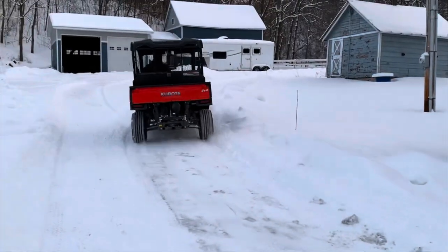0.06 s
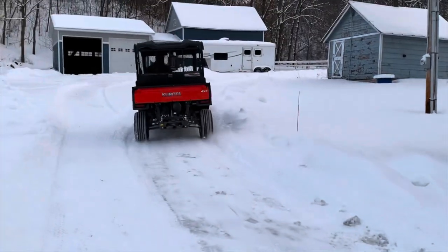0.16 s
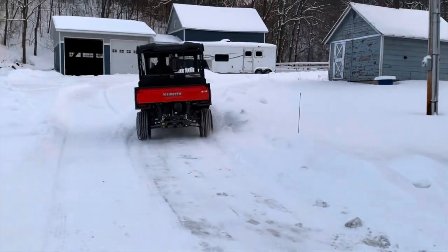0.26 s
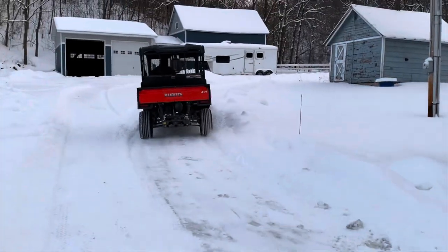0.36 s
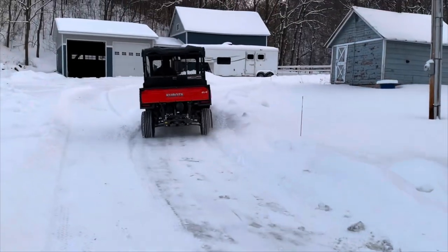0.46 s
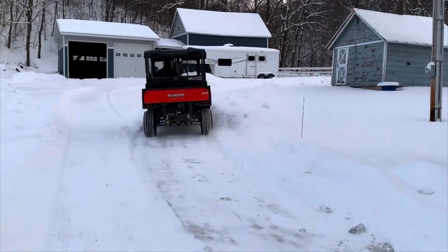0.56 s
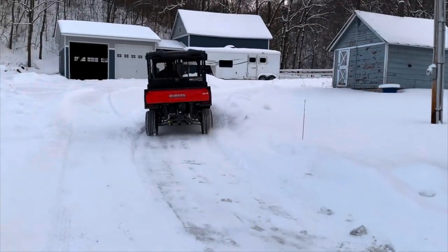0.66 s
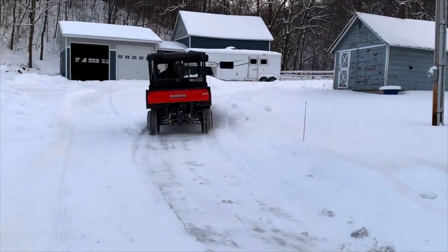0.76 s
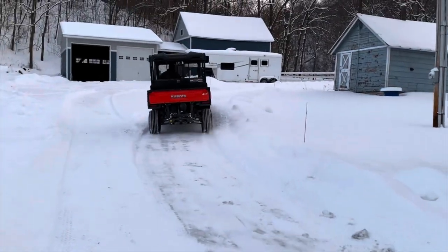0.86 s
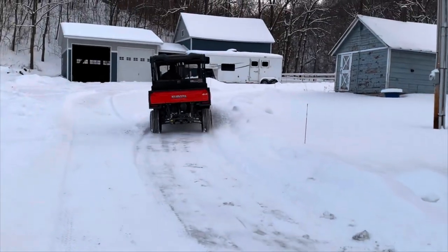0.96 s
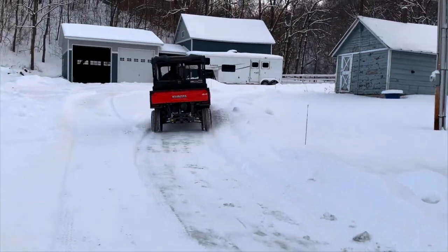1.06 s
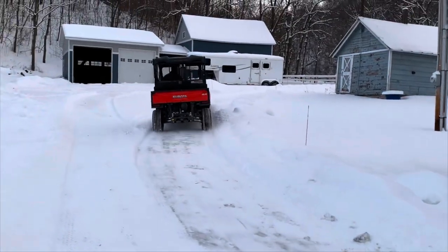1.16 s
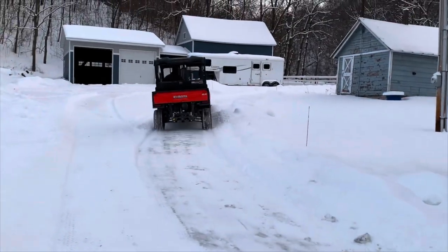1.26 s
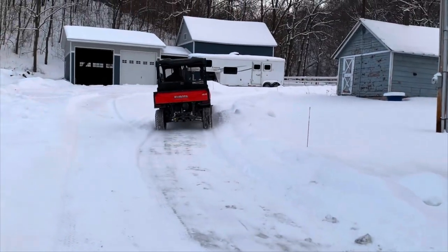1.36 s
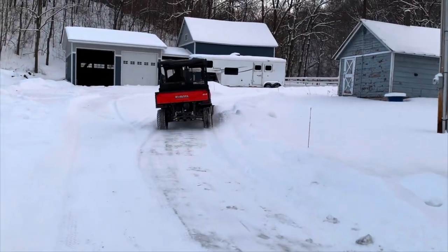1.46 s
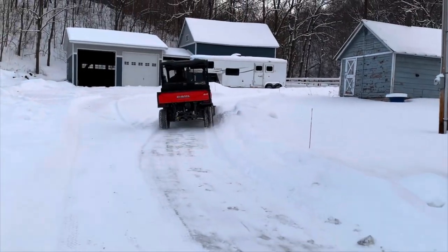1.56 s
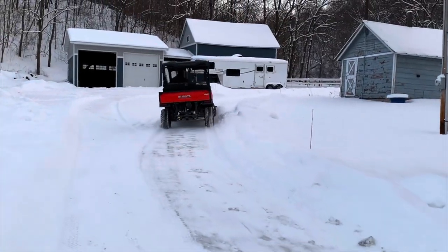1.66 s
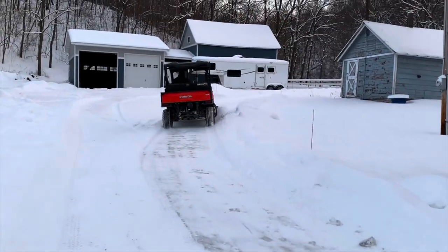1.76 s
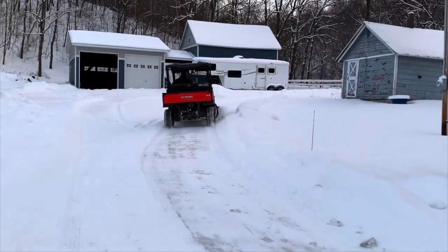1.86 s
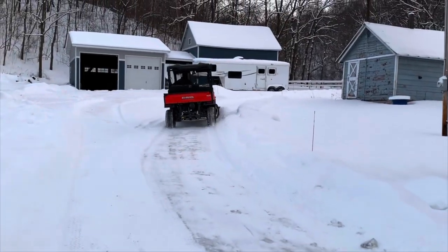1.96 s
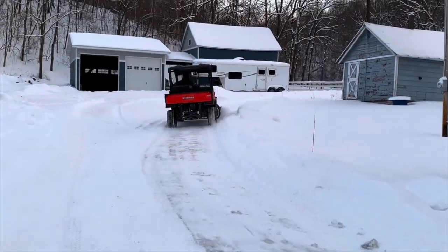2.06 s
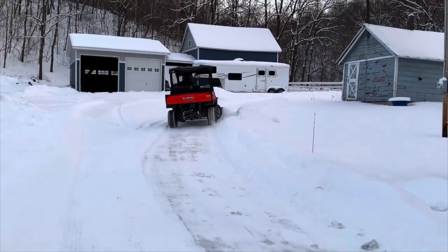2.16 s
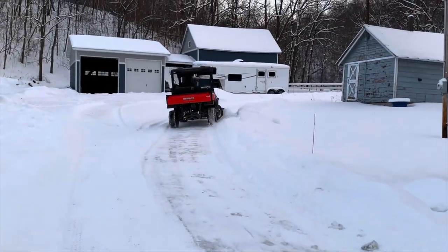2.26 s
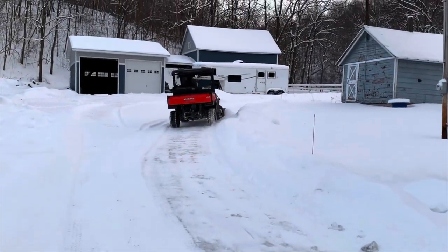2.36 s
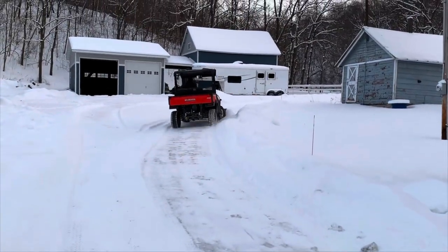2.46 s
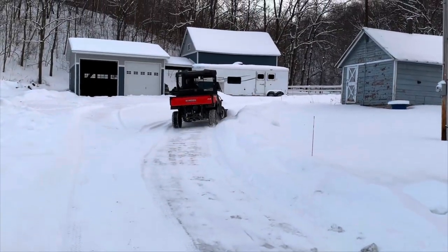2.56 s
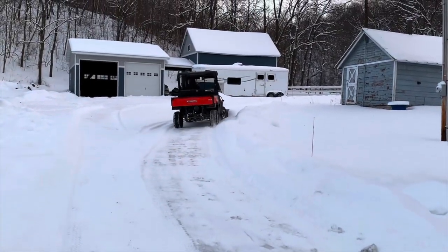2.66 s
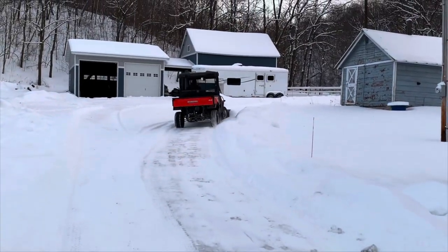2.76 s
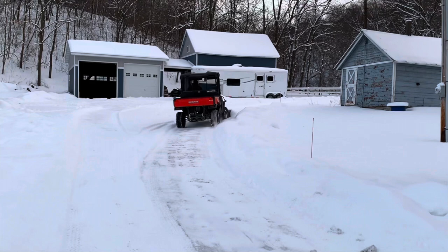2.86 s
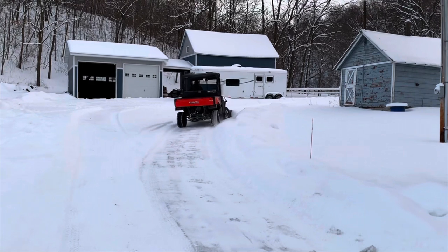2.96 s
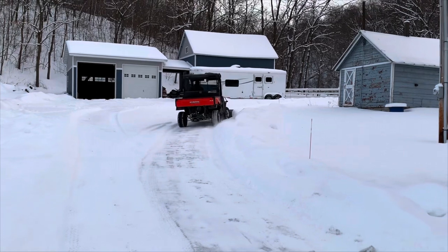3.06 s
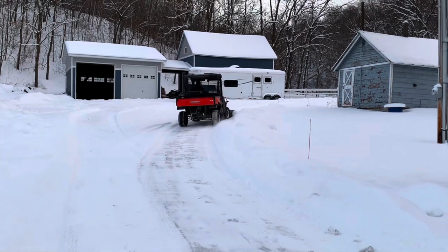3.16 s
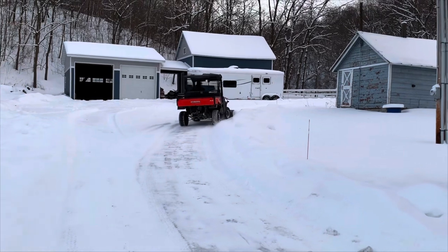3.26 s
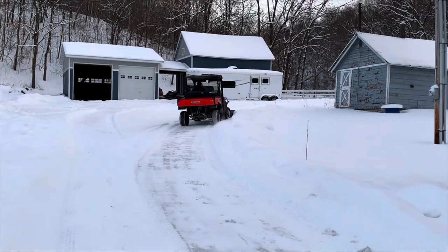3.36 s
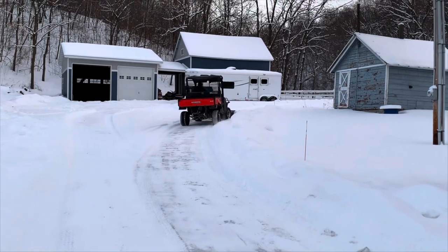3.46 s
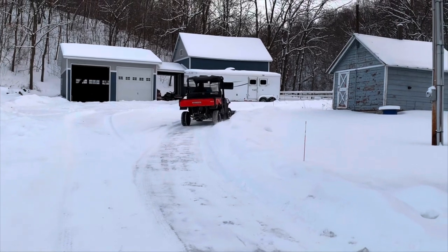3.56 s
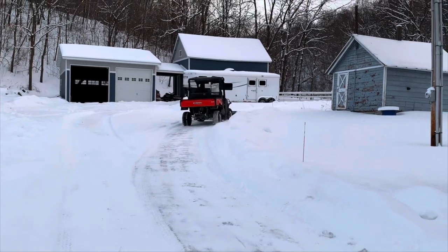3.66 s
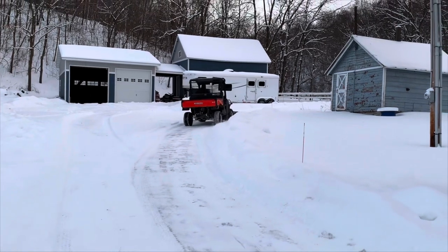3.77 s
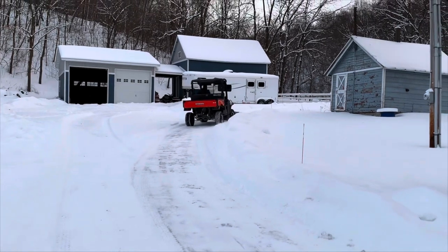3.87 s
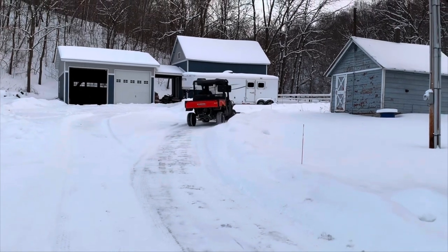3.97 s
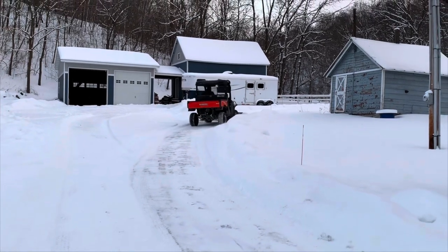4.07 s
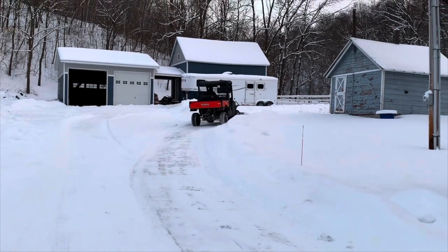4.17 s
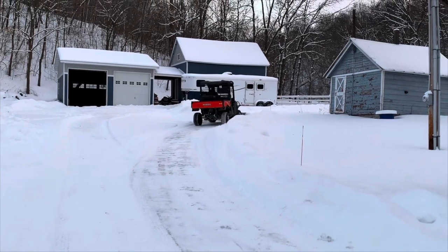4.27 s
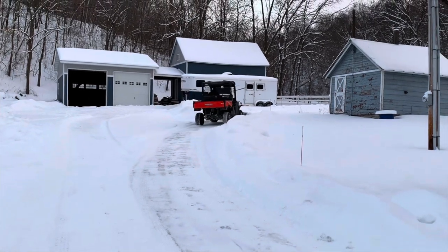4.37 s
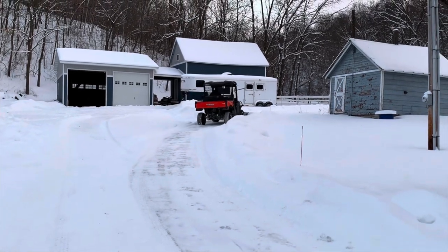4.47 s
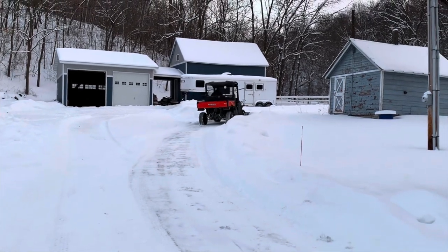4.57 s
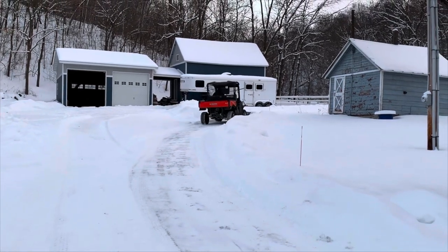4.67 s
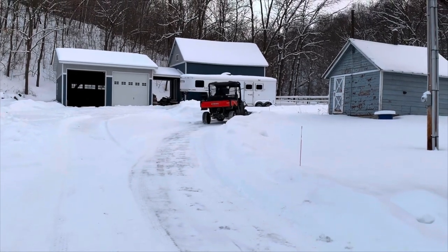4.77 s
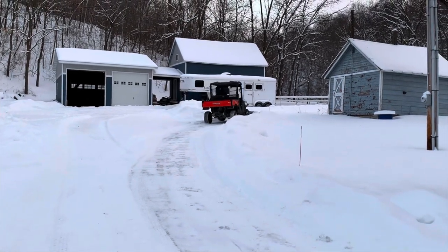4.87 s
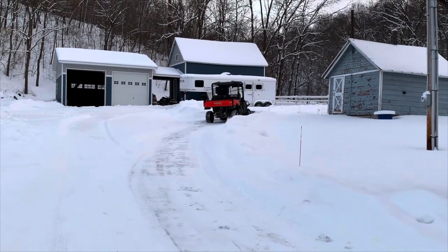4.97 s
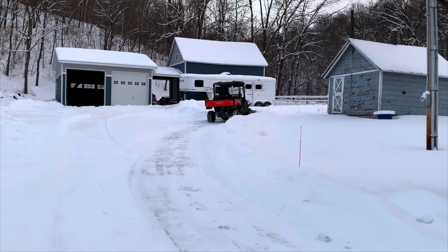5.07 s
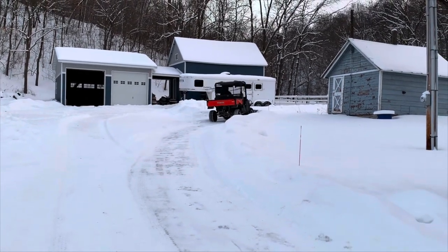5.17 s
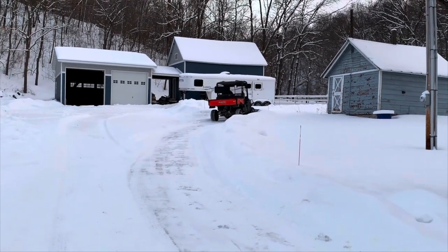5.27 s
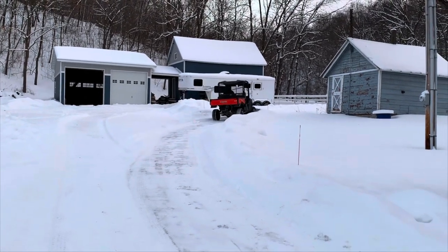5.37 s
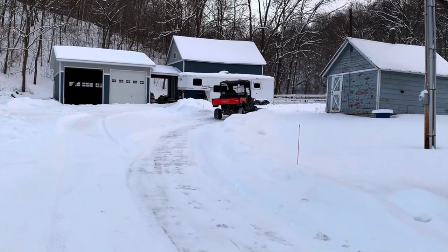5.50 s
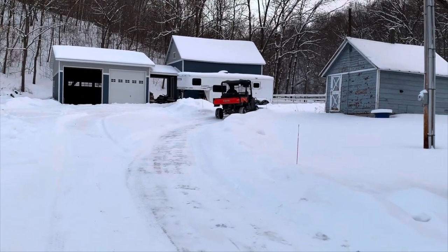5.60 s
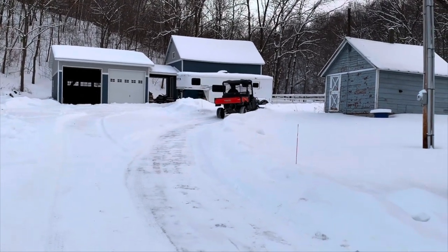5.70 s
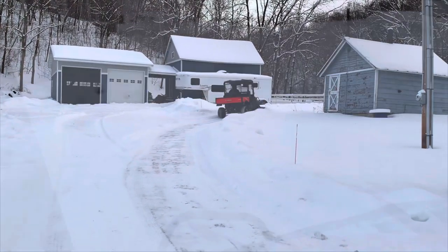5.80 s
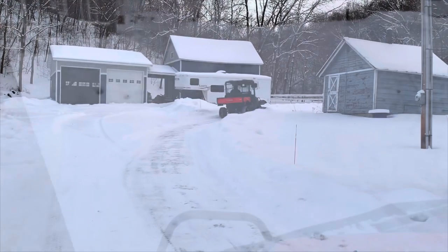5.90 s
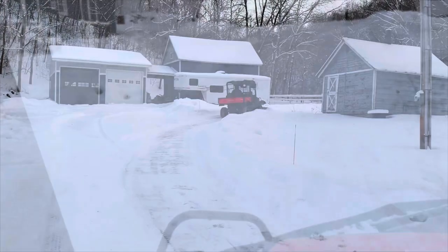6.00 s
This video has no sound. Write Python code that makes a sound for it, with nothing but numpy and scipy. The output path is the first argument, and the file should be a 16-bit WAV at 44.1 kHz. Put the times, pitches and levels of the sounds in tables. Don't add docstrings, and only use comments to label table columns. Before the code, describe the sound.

Open air, light breeze, a stereo microphone near a snowy driveway. From 0 s a small utility vehicle is close and slightly to one side: a low, fast putter of about twenty-eight firings a second, with pulsing exhaust hiss, gear and chain clatter, and a hollow cargo-box hum over bumps in the first second. Panels rattle in short bursts. The engine labours in surges, notably around 0.8, 1.5 and 2.4-3.3 s, its rate rising slightly towards 3 s. A thin, wavering hydraulic whine runs from 1 to 2.8 s, sagging in level. Wind buffets softly, with strong low pops at about 2.5-2.7 and 3.6 s and softer ones until 4.2 s. The vehicle recedes, its bass and hiss weakening while midrange clatter persists. After 4.6 s the load eases; from 5.7 s the sound fades under heavy, slow thuds of a nearer idling engine, strongest at 6 s.

```python
import sys
import numpy as np
from scipy import signal
from scipy.fft import rfft, irfft
from scipy.io import wavfile
from scipy.ndimage import uniform_filter1d

SR = 44100
rng = np.random.default_rng(int(sys.argv[2]) if len(sys.argv) > 2 else 0)


def put_to_file(sound):
    columns = np.atleast_2d(sound).T
    safe = np.clip(columns, -1, 1)
    whole_steps = np.round(safe * 32767)
    wavfile.write(sys.argv[1], SR, whole_steps.astype(np.int16))


def invert_db(x):
    u = np.asarray(x, float) / 20
    return 10 ** u


N = 266364
HZ = np.maximum(np.fft.rfftfreq(N, 1 / SR), 1)
TIME = np.arange(N) / SR


def rms_one(x):
    return x / np.sqrt(np.mean(x ** 2) + 1e-20)


def colour(x, spectrum):
    hz, db = np.transpose(spectrum)
    gain = invert_db(np.interp(np.log(HZ), np.log(hz), db, left=-90, right=-90))
    return rms_one(irfft(rfft(x) * gain, N))


def drift(rate):
    r = np.exp(-80 * np.pi * rate / SR)
    noise = rng.standard_normal(N // 40 + 2002)
    slow = signal.lfilter([1], [1, -2 * r, r * r], noise)[2000:]
    return np.interp(np.arange(N) / 40, np.arange(len(slow)), rms_one(slow))


def ring(clicks, hz, t60):
    r, w = invert_db(-60 / (t60 * SR)), 2 * np.pi * hz / SR
    return signal.lfilter([0, np.sin(w)], [1, -2 * r * np.cos(w), r * r], clicks + 1e-18)


def ring_modes(clicks, modes):
    return sum(sign * invert_db(db) * ring(clicks, hz, t60) for hz, db, t60, sign in modes)


def thuds(rows, t60, cut_hz):
    out = np.zeros(N)
    for s, db, hz in rows:
        click = np.zeros(N)
        click[int(s * SR)] = -invert_db(db + 1.5)
        out += ring(click, hz, t60)
    return signal.sosfilt(signal.butter(2, cut_hz, fs=SR, output="sos"), out)


def spells(rows, floor_db, edge_db_per_s, column=2):
    loudest = np.full(N, float(floor_db))
    for row in rows:
        start, hold = row[:2]
        outside = np.maximum(np.maximum(start - TIME, TIME - start - hold), 0)
        loudest = np.maximum(loudest, row[column] - edge_db_per_s * outside)
    return loudest


def firings(turns, lead, spread_db, scatter_s):
    at = np.flatnonzero(np.diff(np.floor(turns + lead)))
    luck = rng.standard_normal((200, 2))[:len(at)]
    at = at + (scatter_s * SR * luck[:, 0]).astype(int)
    clicks = np.zeros(N)
    clicks[np.clip(at, 0, N - 1)] = invert_db(spread_db * luck[:, 1])
    return clicks


def puffs(turns, depth_db, narrow, late, spread_db):
    size = invert_db(spread_db * rng.standard_normal(200))[np.floor(turns - late + 1.5).astype(int)]
    swell = np.exp(narrow * (np.cos(2 * np.pi * (turns - late)) - 1))
    return 1 + (invert_db(depth_db) - 1) * size * swell


def gated_noise(db, gate, shape):
    return invert_db(db) * colour(gate * rng.standard_normal((2, N)), shape)


# pitch_hz, density_db (per Hz)
GUST_SPECTRUM = [(18, -37), (35, -1), (65, 1), (100, -1), (150, -5), (220, -15), (400, -37.5), (600, -40)]
# start_s, hold_s, common_level_db, difference_level_db
GUST_SPELLS = [(0.0, 0.054, -25.5, -36), (.2, 0.29, -33, -56), (.4, 3.8, -36, -60), (.9, 0.36, -31.5, -53),
               (1.1, 0.03, -30, -50), (1.5, 0.13, -32.5, -36), (2.3, 0.11, -40, -38.5),
               (2.48, .05, -36, -32), (2.65, 0.3, -29.5, -32), (2.9, 0.88, -34, -32.5),
               (3.2, 0.034, -31.5, -28), (3.5, 0.71, -33, -34), (4.3, 0.59, -41, -60),
               (4.8, .1, -38, -49.5), (5.4, .01, -37, -62), (5.7, .34, -68, -45)]


def breeze():
    edge_db_per_s = 87
    common_db = spells(GUST_SPELLS, -40, edge_db_per_s)
    apart_db = spells(GUST_SPELLS, -64, edge_db_per_s, column=3)
    common, apart = (colour(invert_db(2.2 * drift(25)) * rng.standard_normal(N), GUST_SPECTRUM) for _ in range(2))
    lull_db = .3 * np.minimum(common_db + 33, 0)
    return invert_db(common_db + lull_db + 1.84) * common + invert_db(apart_db - 4.8) * apart * [[1], [-1]]


# start_s, level_db (peak), pitch_hz
WIND_POPS = [
    (.058, -30, 95),
    (2.487, -12.5, 124),
    (2.553, -14.5, 127),
    (2.685, -12.5, 94),
    (2.757, -33, 100),
    (3.566, -13.5, 123),
    (3.712, -19, 130),
    (3.955, -30, 90),
    (4.158, -21, 92),
]


def wind_pops():
    return thuds(WIND_POPS, t60=0.068, cut_hz=210)


# start_s, level_db (peak), pitch_hz
IDLE_THUDS = [
    (5.825, -21.5, 95),
    (5.857, -28, 111),
    (5.916, -17.5, 102),
    (5.947, -22.5, 83.5),
    (5.96, -23.5, 118),
    (6.011, -15.5, 94),
]


def near_engine():
    return thuds(IDLE_THUDS, t60=0.18, cut_hz=155)


# start_s, hold_s, level_db
PUMP_RUNS = [
    (1.0, 1.8, -37),
]


def pump():
    sag_db = 3.5 * (TIME - 1)
    whine_db = spells(PUMP_RUNS, -70, edge_db_per_s=62) - sag_db
    angle = 2 * np.pi * (621 * TIME + 0.45 * drift(1.37))
    whine = np.sin(angle) + invert_db(-11) * np.sin(2 * angle)
    return invert_db(whine_db - 8 + 3 * drift(7)) * whine


# start_s, hold_s, level_db
BUMP_SPELLS = [
    (.08, 0.11, -36.5),
    (.3, .12, -35.5),
    (.5, .4, -44.5),
    (.73, 0.029, -37.5),
    (1.36, 0.031, -42),
    (2.38, .02, -46.5),
    (2.65, .08, -44),
    (4.2, 0.24, -51),
    (5.0, 0.59, -50),
    (5.8, .02, -49.5),
]


def cargo_box(turns):
    knocks = firings(turns, lead=.08, spread_db=2.5, scatter_s=.0015)
    box = ring(knocks, 985, .045) - .6 * ring(knocks, 905, .045)
    return invert_db(spells(BUMP_SPELLS, -49, edge_db_per_s=104) - 4) * rms_one(box)


# pitch_hz, level_db, t60_s
PANEL_MODES = [(1410, -9, .04), (1520, -8, .04), (1630, 0, .04), (1700, -1, .04), (1780, -4, .035),
               (1920, -6, .03)]
# start_s, hold_s, level_db
RATTLE_SPELLS = [(.2, 0.35, -41), (.75, 0.081, -33), (1.0, 0.54, -41), (1.75, 0.038, -42), (2.2, .2, -57),
                 (2.58, 0.035, -34), (2.85, .5, -54), (3.55, 0.38, -38.5), (4.0, 0.44, -41),
                 (4.6, .4, -41.5), (5.1, 0.07, -45.5), (5.6, 0.018, -62)]


def loose_panels(turns):
    panels = 0
    for hz, db, t60 in PANEL_MODES:
        panels = panels + invert_db(db) * ring(firings(turns, lead=.12, spread_db=2.0, scatter_s=.001), hz, t60)
    panels = ring(panels, 1680, .01)
    return invert_db(spells(RATTLE_SPELLS, -70, edge_db_per_s=52) - 2.5) * rms_one(panels)


# start level_db, then shares of distance loss, surges, easing and fade (plain ratios)
LAYER_LEVELS = dict(low=(-23, 1.0, -0.07, 0.55, 0), upper=(-34, 1.47, 0.06, 0.2, 3),
                body=(-34.5, 0.8849, 0.12, 0.37, -.3), covers=(-37, 0.0558, 0.16, 1.15, -0.25),
                gears=(-47.5, 0.1259, 0.33, 0.39, 0.7), gas=(-44, 0.66, 1.0, -0.16, .8))
# start_s, hold_s, level_db
LOAD_SURGES = [(.15, .02, 3), (.45, .02, 1.5), (.75, 0.14, 5), (1.5, .12, 5.5), (2.1, 0.015, 2.5),
               (2.4, 0.5, 4.5), (2.95, 0.34, 5), (3.6, .02, 4), (3.9, .02, 2.5), (4.25, 0.072, 3),
               (4.65, .02, 3.5), (4.8, .02, 3), (5.55, .02, 2)]


def level(name):
    start_db, far, surge, ease, fade = LAYER_LEVELS[name]
    start_m, away_m_per_s = 9.0, 4.0
    distance_db = 20 * np.log10(1 + away_m_per_s * TIME / start_m)
    surge_db = spells(LOAD_SURGES, 0, edge_db_per_s=20)
    ease_db = 5.5 * np.maximum(TIME - 4.61, 0)
    fade_db = 16.0 * np.maximum(TIME - 5.67, 0)
    return start_db - far * distance_db + surge * surge_db - ease * ease_db - fade * fade_db


# pitch_hz, density_db (per Hz)
BODY_SPECTRUM = [(190, -8.5), (260, -0.5), (340, -0.5), (450, -12), (640, -7.5), (900, -7), (1170, -12.5),
                 (1300, -5)]


def body(turns):
    gate = puffs(turns, depth_db=1.5, narrow=0.63, late=0.036, spread_db=7.0)
    return gated_noise(level("body") - .3, gate, BODY_SPECTRUM)


# pitch_hz, density_db (per Hz)
COVER_SPECTRUM = [(1050, -13), (1200, -15.5), (1400, -6), (1670, -2.5), (1950, -7), (2300, -7),
                  (2700, -15.5), (3000, -12.5)]


def covers(turns):
    gate = puffs(turns, depth_db=7.5, narrow=1.5, late=-.02, spread_db=1.4)
    return gated_noise(level("covers"), gate, COVER_SPECTRUM)


# pitch_hz, density_db (per Hz)
GEAR_SPECTRUM = [(2300, -50), (2700, -16), (3200, 3.5), (3700, 2), (4500, -4), (5000, -28.5), (5300, -63)]
# pitch_hz, density_db (per Hz)
CHAIN_SPECTRUM = [(4200, 9), (4800, 16.5), (5200, 14.5), (5700, 17.5), (6250, 15), (6800, 13.5), (7300, 3),
                  (7900, -43)]


def drive_train(turns, grit):
    gears, chain = (puffs(turns, depth_db=6.3, narrow=2.0, late=-.04, spread_db=2.5) for _ in range(2))
    gears_db = level("gears")
    return (gated_noise(gears_db - .4, grit * gears, GEAR_SPECTRUM)
            + gated_noise(gears_db - .6, grit * chain, CHAIN_SPECTRUM))


# pitch_hz, density_db (per Hz)
PUFF_SPECTRUM = [(6600, -20), (7400, -3), (8500, -1), (10300, 0), (11800, -1), (12400, -25)]
# pitch_hz, density_db (per Hz)
FIZZ_SPECTRUM = [(11600, -25), (12200, 0), (13400, 0), (15600, -2), (15900, -60)]


def exhaust_gas(turns, grit):
    gas, fizz = (puffs(turns, depth_db=10.3, narrow=2.0, late=-.04, spread_db=2.2) for _ in range(2))
    gas_db = level("gas")
    return (gated_noise(gas_db + 0.72, grit * gas, PUFF_SPECTRUM)
            + gated_noise(gas_db - 1.3, grit * np.sqrt(gas * fizz), FIZZ_SPECTRUM))


def clatter(turns):
    grit = invert_db(1.0 * drift(130))
    return body(turns) + covers(turns) + drive_train(turns, grit) + exhaust_gas(turns, grit)


# time_s, firing_rate_hz
ENGINE_SPEED = [(0.0, 28.31), (0.6, 27.99), (1.0, 27.3), (1.2, 27.29), (1.6, 28.27), (2.0, 28.76),
                (2.2, 28.56), (2.4, 28.58), (2.8, 29.54), (3.0, 29.88), (3.4, 29.58), (4.0, 28.46),
                (4.4, 28.29), (4.8, 28.38), (5.0, 28.65), (5.4, 29.52), (5.6, 29.49), (6.04, 29.18)]


def firing_cycles():
    s, rate = np.transpose(ENGINE_SPEED)
    return -.06 + np.cumsum(np.interp(TIME, s, rate)) / SR


# pitch_hz, level_db, t60_s, polarity (sign)
LOW_MODES = [(114, 0, .11, 1), (143, -2.3, .09, -1)]
# pitch_hz, level_db, t60_s, polarity (sign)
THUMP_MODES = [(58, -17.5, .12, -1), (170, -19, .09, -1)]
# pitch_hz, level_db, t60_s, polarity (sign)
UPPER_MODES = [(196, 0, .13, -1), (256, -6, .12, 1), (300, -11, .09, 1), (335, -9, .1, -1),
               (380, -12, .08, 1)]


def exhaust(turns):
    soft = signal.butter(2, 350, fs=SR, output="sos")
    early = signal.sosfilt(soft, firings(turns, lead=.4, spread_db=.5, scatter_s=.0001))
    late = signal.sosfilt(soft, firings(turns, lead=0.2174, spread_db=-2.3, scatter_s=.0001))
    thump_gain = invert_db(1.5 * TIME)
    low = rms_one(ring_modes(early, LOW_MODES) + thump_gain * ring_modes(early, THUMP_MODES))
    upper = rms_one(ring_modes(late, UPPER_MODES))
    return invert_db(level("low") + 1.12) * low + invert_db(level("upper") + 0.95) * upper


# pitch_hz, left_lead_rad, likeness (0-1), left_over_right_db
PORT_PAIR = [(50, 0, .99, .9), (300, .05, .99, .8), (700, .2, .85, 3), (1300, .4, .85, 1.6),
             (2200, 1.5, .75, 0), (3100, 2.9, .7, 0), (4000, .8, .55, -1), (5600, 2.2, .65, -7),
             (6700, 0, .7, -1), (8300, -3.14, .93, 0), (10900, -6.28, .93, 0), (17000, -14.3, .93, 0)]
PLACES = [(1.06, 1.3), (.96, .55)]


def ports(direct, scattered):
    hz, lead, alike, tilt_db = np.transpose(PORT_PAIR)
    half = invert_db(np.interp(HZ, hz, tilt_db) / 2)
    direct, scattered, right = rfft(direct), rfft(scattered), []
    for stretch, power in PLACES:
        likeness = np.where(hz == 3100, alike ** (1 / power), alike)
        likeness = np.where((hz > 3500) & (hz < 7000), alike ** power, likeness)
        same = np.interp(HZ, hz, likeness)
        turn = np.exp(-1j * np.interp(HZ, np.where(hz < 5000, hz * stretch, hz), lead))
        mixed = same * direct + np.sqrt(1 - same ** 2) * scattered
        right.append(irfft(mixed * turn / half, N))
    moved = np.clip((TIME - .8) / 2.5, 0, 1)
    return np.array([irfft(direct * half, N), right[0] + moved * (right[1] - right[0])])


def scene():
    turns = firing_cycles()
    tonal = exhaust(turns) + loose_panels(turns) + cargo_box(turns) + pump()
    direct, scattered = clatter(turns)
    vehicle = ports(direct + tonal, scattered + np.roll(tonal, 130))
    return vehicle + breeze() + near_engine() + wind_pops()


BOTH_SURVIVE = [.2, .28, .76, .83, 1.26, 1.53, 1.62, 1.99, 2.05, 3.06, 3.2, 3.24, 3.9, 4.6, 4.73, 5.08,
                5.61, 5.89, 5.96]


def joint_stereo(x, margin_db, low_extra_db, from_hz):
    hz, s, (mid, side) = signal.stft([x[0] + x[1], x[0] - x[1]], SR, nperseg=2048)
    band = (hz // np.where(hz < 5000, 260, 460) + 100 * (hz >= 5000)).astype(int)
    member = (band[:, None] == np.unique(band)).astype(float)
    ratio = member @ (member.T @ abs(mid) ** 2 / (member.T @ abs(side) ** 2 + 1e-20))
    away = np.min(abs(s[:, None] - BOTH_SURVIVE), axis=1) > .013
    active = (hz[:, None] > from_hz) & away
    luck = uniform_filter1d(rng.standard_normal((member.shape[1], len(s))), 3)
    margin_db = margin_db + low_extra_db * (hz[:, None] < 7200) + 4.5 * member @ luck
    mid_kept = mid * ~(active & (ratio < invert_db(-2 * margin_db)))
    side_kept = side * ~(active & (ratio > invert_db(2 * margin_db)))
    mid, side = signal.istft(np.array([mid_kept, side_kept]), SR)[1][:, :N]
    return np.array([mid + side, mid - side]) / 2


def top_cut(x):
    return signal.sosfilt(signal.butter(12, 16930, fs=SR, output="sos"), x)


def record(dry):
    cut = signal.sosfilt(signal.butter(3, 38, "high", fs=SR, output="sos"), dry)
    mix = joint_stereo(cut, margin_db=2.5, low_extra_db=5.0, from_hz=2500)
    return top_cut(mix)


dry = scene()
out = record(dry)
put_to_file(out)
```